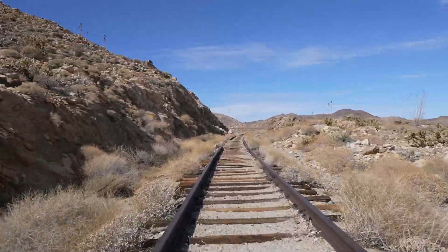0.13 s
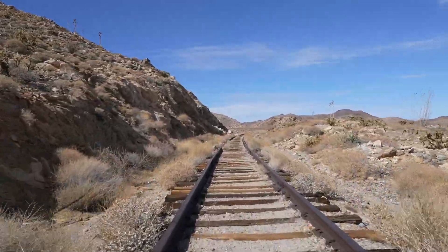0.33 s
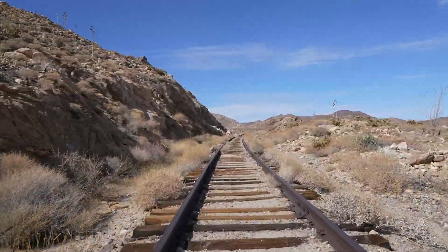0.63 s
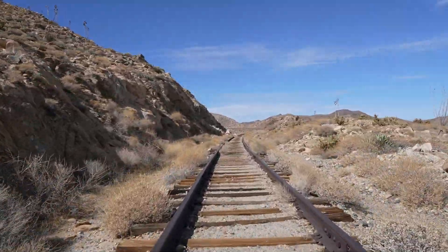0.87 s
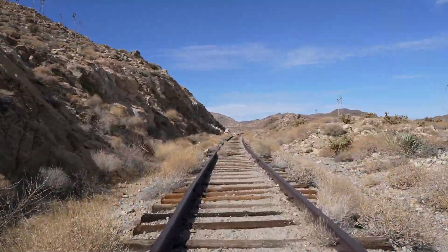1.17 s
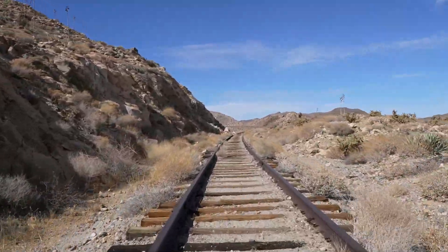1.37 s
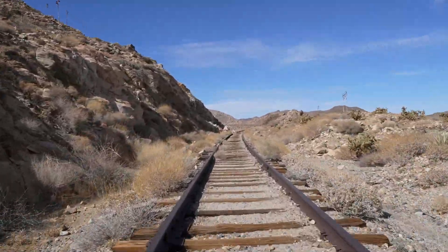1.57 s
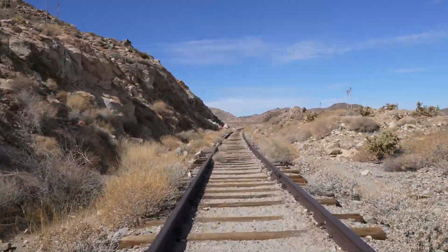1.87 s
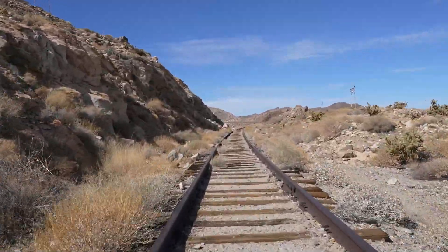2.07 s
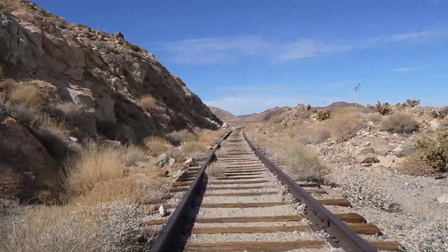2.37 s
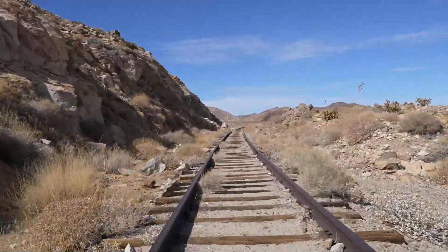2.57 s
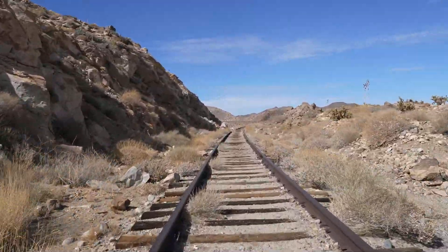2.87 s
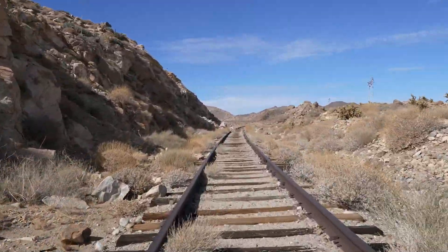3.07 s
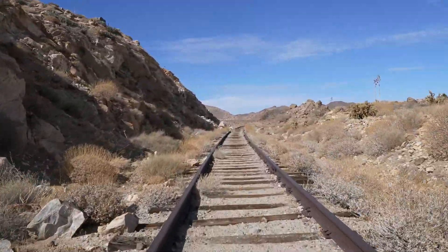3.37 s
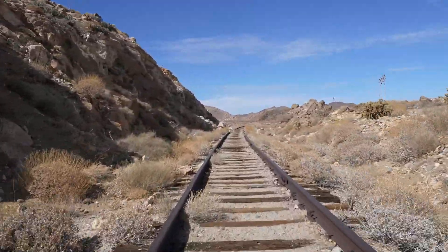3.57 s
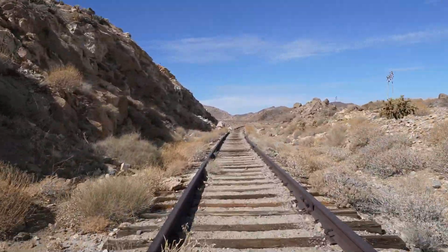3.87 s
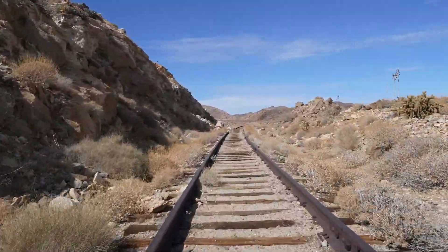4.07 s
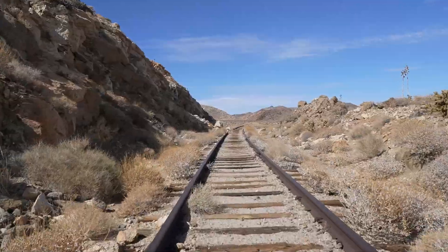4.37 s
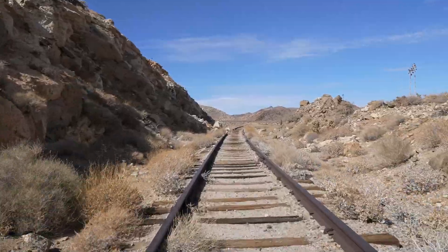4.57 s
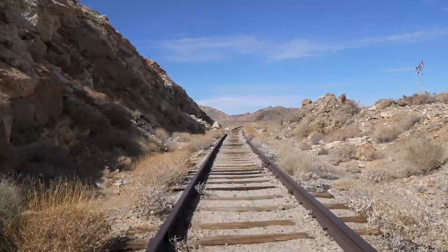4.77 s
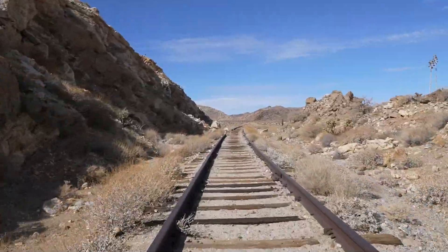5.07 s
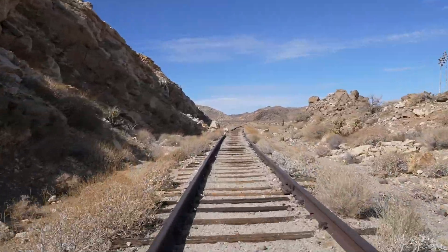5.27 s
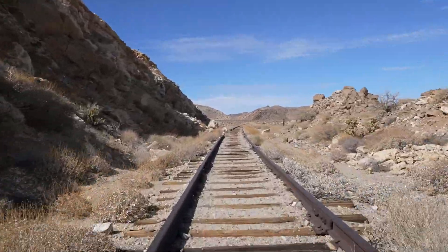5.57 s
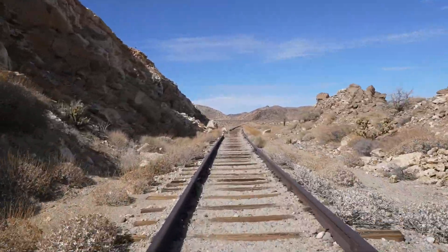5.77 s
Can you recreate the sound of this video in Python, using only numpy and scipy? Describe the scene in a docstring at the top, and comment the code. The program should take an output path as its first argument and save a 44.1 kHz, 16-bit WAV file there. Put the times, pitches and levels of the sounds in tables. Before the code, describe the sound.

A small motor cart rolls along railway tracks with a loud throbbing rumble, a puttering engine and scattered sharp clacks.

```python
"""A throbbing boom and a puttering engine: a small motor cart on old desert track, heard from on board.
Out-of-round wheels pump the deck and tap twice a turn; the one-cylinder engine puffs and rings its casing.
The boom lurches about once a turn, the frame rumbles, and rough spots jolt it with a crack, clack and thud.
Underneath, steel grinds on rusty rail, dry weeds swish along the underside and the air stream rumbles."""
import sys
import numpy as np
from scipy import signal
from scipy.fft import rfft, irfft
from scipy.io import wavfile
from scipy.ndimage import uniform_filter1d, minimum_filter1d

SR = 44100
rng = np.random.default_rng(int(sys.argv[2]) if len(sys.argv) > 2 else 0)


def bounce(signal):
    """Save signal as a 16-bit WAV file at the path given by the first command-line argument."""
    frames = np.transpose(np.atleast_2d(signal))
    limited = np.clip(frames, -1, 1)
    pcm = np.round(limited * 32767).astype(np.int16)
    wavfile.write(sys.argv[1], SR, pcm)


N = 260631
T = np.arange(N) / SR
FREQS = np.arange(N // 2 + 1) * SR / N

# the deck's boom along the ride: (time [s], level [dB], width as side minus mid [dB])
DECK_BOOM = [(0, -22, 9), (.45, -16, 25), (.6, -15, 8), (.82, -22, -1), (1.0, -29, 38), (1.2, -30, -5),
             (2.2, -22, 4), (2.68, -27, 10), (3.15, -20, -6), (3.9, -21.5, 19), (4.4, -19.5, 9),
             (4.7, -29, -3), (5.2, -18, 26), (5.65, -21, 4), (5.91, -20, 2)]
# lurches of the low boom, about one per wheel turn: (time [s], mid level [dB], side level [dB])
BOOM_LURCHES = [(0.07, -39, -12), (0.17, -29, -21), (0.25, -39, -17), (0.34, -33.0, -20), (0.54, -23, -26),
                (0.63, -26, -10.5), (0.73, -16.5, -22), (0.82, -14, -33), (0.97, -36, -12),
                (1.07, -23.5, -18), (1.15, -18, -33.0), (1.28, -23.5, -22), (1.37, -22, -19),
                (1.44, -15.5, -33.0), (1.52, -20, -31), (1.62, -17.5, -37), (1.72, -16.5, -34),
                (1.84, -25, -16), (1.93, -16.5, -33.0), (2.03, -23, -19), (2.12, -16, -34),
                (2.21, -12, -21), (2.31, -18, -33.0), (2.41, -16, -34), (2.46, -19, -22),
                (2.55, -28.5, -15.5), (2.83, -24, -35), (2.88, -22, -23.5), (2.97, -31, -15.0),
                (3.21, -24, -35), (3.3, -39, -20), (3.39, -16, -33.0), (3.501, -12, -33.0),
                (3.63, -28, -17), (3.719, -15, -29), (3.82, -23.5, -17), (3.95, -44, -17), (4.01, -21, -27),
                (4.09, -19, -28), (4.16, -33, -16), (4.24, -21, -16), (4.33, -18, -34), (4.52, -17.5, -17),
                (4.62, -16.5, -31.0), (4.71, -41, -15), (4.8, -13.5, -33.0), (4.98, -23, -33.0),
                (5.14, -24.5, -14), (5.27, -42, -6), (5.37, -25, -25), (5.43, -40, -14), (5.52, -43, -18),
                (5.61, -17.5, -14), (5.72, -23.5, -26)]
# moments when the wheels run light: (time [s], half length [s], level change [dB])
LIGHT_RUNNING = [(0.095, 0.027, -12.5), (0.47, 0.026, -7.5), (1.56, 0.016, -2.5), (2.237, 0.012, -19),
                 (2.5, 0.014, -3.5), (3.587, 0.02, 1), (4.37, .035, -3), (4.555, 0.019, -5),
                 (4.918, 0.015, -10), (5.08, 0.021, -5), (5.222, 0.036, -7), (5.291, 0.03, -12),
                 (5.414, .014, -5)]
# wheel speed: (time [s], turn rate [Hz])
TURN_RATE = [(0, 10.65), (2.8, 10.65), (3.4, 10.72), (4.9, 10.45), (5.9, 10.55)]
# engine speed: (time [s], firing rate [Hz])
FIRING_RATE = [(0.0, 27.65), (1.0, 28.09), (3.3, 28.05), (4.6, 27.48), (5.9, 27.67)]
# wheel hits on rough spots: (time [s], clack of loose parts [dB], crack of steel [dB], thud [dB],
# thud pitch [Hz], thud width as side minus mid [dB])
ROUGH_SPOTS = [(0.049, 0, 0, -22, 205, -5), (0.143, 0.5, 1.5, -14, 203, 21), (0.204, -10, -17, -19, 280, 0),
               (0.433, -5.5, -20, -17, 214, 11), (0.798, 2, 2.5, -17, 204, -2),
               (0.852, -5, -15, -27, 163, 3), (0.894, -10, -1.5, -18.5, 207, -14),
               (0.946, -5, -4, -27, 226, -4), (1.041, -15, -5.5, -16, 172, 6),
               (1.222, -8, -10, -22, 283, 2), (1.253, -2, -5, -22, 167, -1),
               (1.328, -15, -12, -17.5, 285.5, -2), (1.69, -1, -7, -24, 205, 10),
               (1.792, -12, -9, -17, 170, 24), (1.893, 0, -7, -18, 180, 10), (1.976, -6, -7, -13, 172, 18),
               (2.068, -18, -5, -15.5, 200, -4), (2.259, 2.5, -0.5, -16.5, 192, -2),
               (2.538, -7, -16, -17, 261, -4), (2.636, -6, -1.5, -18, 214, 5),
               (2.728, -3, -3, -12, 183, 14), (2.963, -9, -20, -16.5, 213, -6),
               (3.008, -3, -7, -23, 145, 0), (3.097, -9, -4, -20.5, 172, -1), (3.149, -5, -6, -29, 146, -2),
               (3.188, -13, -4, -17.5, 192, -6), (3.473, 5, 2.5, -14, 183, -10),
               (3.756, -0.5, -26, -21, 229, 15), (3.786, -1.5, -26, -34, 200, 8),
               (3.85, -6, -0.5, -18, 178, 12), (3.9, -10, -2, -16.5, 176, -8),
               (4.012, -14, -23, -21, 280, -2.5), (4.046, -14, -7, -23, 177, -4),
               (4.114, -1, -13, -24.5, 195, 2), (4.225, -2, -3, -27, 145, -1),
               (4.437, -1, -18, -25, 200, -2), (4.51, -6, -1, -20, 145, 1), (4.611, -16, -9, -21, 274, -10),
               (4.695, -5, -20, -18.5, 181, 19), (4.949, -3, -16, -15.5, 155, -6),
               (4.972, -13, -10, -19.5, 235, -5), (4.989, -6, 3.5, -20, 177, -10),
               (5.271, -1, -9, -29, 146, 6), (5.342, -6, -6, -19.5, 235, -8), (5.385, -3, -8, -23, 208, 4),
               (5.528, -10, -14, -25, 291, 2), (5.749, 0.5, 0, -21, 178, 3)]
# texture of the rail: (time [s], grind [dB], hiss [dB])
RAIL_SURFACE = [(0, -1.5, 2.5), (.5, -1, -1), (.8, -0.5, 1), (1.25, 0, 2), (2.2, -1, 0), (3.1, -1, 0.5),
                (4.35, -1, 1), (4.9, 0.5, 3.5), (5.91, 0.5, 4.5)]
# weeds brushing the cart: (time [s], half length [s], level [dB])
WEED_BRUSHES = [(0.734, 0.029, -10), (0.753, .007, -9), (.804, .005, -10), (1.907, 0.047, -13),
                (2.677, 0.2, -13.5), (3.497, 0.063, -13), (3.934, 0.027, -13), (5.74, 0.095, -13)]

# ringing modes: (frequency [Hz], bandwidth [Hz], level [dB per Hz])
CASING_MODES = [(593.5, 37, -61), (894, 47, -61.5), (1011.6, 39.5, -58.5), (1342, 146, -69.5),
                (1447, 60, -64.5), (1684, 21, -68.5), (2076, 160, -77), (2860, 110, -82.5)]  # engine casing
FRAME_MODES = [(126.5, 29.2, -44.5), (167.6, 46, -46.5), (221, 71, -49), (286.3, 53, -51.5),
               (352.4, 80, -58), (409.5, 86, -57)]  # frame and floor
WHEEL_MODES = [(937, 150, -67), (2970, 230, -66.5), (3950, 110, -85), (4690, 180, -75.5), (5420, 84, -73)]  # struck wheel

# noise colours: (frequency [Hz], level [dB per Hz])
EXHAUST_EQ = [(60, -71), (130, -55), (180, -49), (240, -49), (300, -51), (400, -63), (700, -78)]  # low, round puff
VALVE_EQ = [(500, -103), (1200, -71), (2500, -102), (3500, -89.5), (5000, -91.5), (8000, -100.5),
            (11000, -104)]  # thin tick
CLACK_EQ = [(300, -58), (600, -78), (1000, -62.5), (1400, -62), (2000, -72.5), (3000, -80.5), (5000, -91),
            (8000, -93), (15000, -108)]  # loose parts and wheel taps
CRACK_EQ = [(1600, -77), (2600, -72.5), (5000, -80), (8000, -85.5), (15000, -102)]  # bright bite of steel
GRIND_EQ = [(200, -100), (450, -65.5), (680, -63), (780, -65.5), (1000, -69.5), (1200, -75), (1700, -76),
            (2700, -79), (3400, -85), (5500, -89), (9000, -103)]  # midrange of the rolling treads
RUST_EQ = [(2000, -103), (4500, -92.5), (8000, -92.5), (10500, -97), (16000, -96.5)]  # fine, high hiss
WEED_EQ = [(2000, -93), (4000, -78), (8000, -79.5), (12000, -81), (16000, -80)]  # dry, airy swish
WIND_EQ = [(12, -47), (24, -47), (34, -50.5), (50, -47), (75, -42.5), (110, -46), (160, -56.5)]  # deep buffeting

# how much louder the left side is: (frequency [Hz], left minus right [dB])
LEFT_TILT = [(20, 0.5), (200, 0.5), (400, -0.5), (650, -3.5), (1000, 1), (1450, 0.5), (2100, 0.5),
             (3600, 3), (5000, 0.5), (7500, 2), (11000, 4.5), (20000, 1)]


def deck(half_turns, boom_db, width_db, boom_hz=100.15, swing_hz=2.8, wander_hz=6.16, width_drift_db=-8.5):
    """Wheel hop pumps the deck's drum mode twice a turn; its pitch rises under load; the boom lurches."""
    load = -np.cos(2 * np.pi * half_turns)
    hop_strength = uniform_filter1d(cycle_gains(half_turns, scatter_db=1.0), size=600)
    throb = undb(boom_db) * unit_rms((1 + 0.57 * load) * hop_strength)
    pitch_hz = boom_hz + swing_hz * load + wander_hz * wander(24.2)
    phase = 2 * np.pi * np.cumsum(pitch_hz) / SR
    spread = np.arctan(undb(width_db + width_drift_db * wander(2.9)))
    lurch_mid, lurch_side = lurches() * (1 + 0.5 * load)
    mid = np.hypot(throb * np.cos(spread), lurch_mid)
    side = np.hypot(throb * np.sin(spread), lurch_side)
    # the boom's left-right phase wanders at random, making it sound wide and shifting
    lead = np.arctan2(side, mid) * np.tanh(20 * wander(2.66))
    return np.hypot(mid, side) * np.sin(phase + np.array([lead, -lead]))


def lurches(half_s=0.034):
    """Mid and side envelopes of the low boom's lurches, about one per wheel turn."""
    return sum(undb([[mid_db], [side_db]]) * swell(s, half_s) for s, mid_db, side_db in BOOM_LURCHES)


def lulls():
    """A gain that ducks the rumble for a moment where the wheels run light."""
    return undb(sum(db * swell(s, half_s) for s, half_s, db in LIGHT_RUNNING))


def engine(firings, flare_db=1.63):
    """Each firing puffs the exhaust, ticks the valves and rattles the casing, whose modes flare singly."""
    rattle = 0.4 + 0.48 * blows(firings + 0.11, peak=0.23, scatter_db=1.6)
    casing = 0
    for mode in CASING_MODES:
        flare = undb(flare_db * wander(13))
        casing += flex(excite(rattle * flare, resonances([mode])))
    puffs = excite(blows(firings - .22, peak=0.2, scatter_db=1.7), colour(EXHAUST_EQ))
    ticks = excite(0.3 + .5 * blows(firings - .02, peak=0.38, scatter_db=3.0), colour(VALVE_EQ))
    return casing + puffs + ticks


def frame(shudder_db, swell_db=2.5):
    """Uneven rail shakes a rumble out of the frame; each mode swells and fades on its own."""
    rumble = 0
    for hz, bandwidth, db in FRAME_MODES:
        shaking = undb(shudder_db + db) * unit_rms(undb(swell_db * wander(8.9)))
        ring = excite(shaking, resonances([(hz, bandwidth, 0)]) ** 2)
        rumble += flex(ring, delay_s=.0008)
    return rumble


def shudder(rise_s=0.012, fall_s=0.024, rest_db=-0.9, jolt_db=-0.5, lurch_db=4, restless_db=1.0):
    """Frame shake in dB: it wanders, rises with each lurch, and builds as a wheel climbs a rough spot."""
    jolts = sum(undb(thud_db) * spike(s, rise_s, fall_s) for s, _, _, thud_db, _, _ in ROUGH_SPOTS)
    shake = 1 + undb(jolt_db) * jolts + undb(lurch_db) * np.hypot(*lurches())
    return rest_db + 20 * np.log10(shake) + restless_db * wander(15)


def knocks(clack_s=0.0052, scrape_db=-5.5, ring_db=6.5, grit_db=3.5, wander_hz=14.0):
    """A wheel hits a rough spot: steel cracks through grit, loose parts ring the casing, the frame thuds."""
    clack, crack, thuds = np.zeros(N), np.zeros(N), np.zeros((2, N))
    drift_cycles = wander_hz * np.cumsum(wander(39.5)) / SR
    for s, clack_db, crack_db, thud_db, thud_hz, width_db in ROUGH_SPOTS:
        age = np.maximum(T - s, 0)
        strike = pulse(age, clack_s) ** 2
        bite = spike(s + clack_s, rise_s=.003, fall_s=0.0078)
        flange_scrape = undb(scrape_db) * swell(s + clack_s, half_s=0.013)
        clack += undb(clack_db) * np.maximum(strike, flange_scrape)
        crack += undb(crack_db) * np.maximum(bite, flange_scrape)
        tail = slice(int(s * SR), int(s * SR) + SR // 4)
        thuds[:, tail] += undb(thud_db) * thud(age[tail], thud_hz, drift_cycles[tail], width_db)
    chatter = excite(clack, colour(CLACK_EQ))
    casing_ring = undb(ring_db) * excite(clack, resonances(CASING_MODES))
    crunch = crack * unit_rms(undb(grit_db * wander(900)))
    steel = excite(crunch, colour(CRACK_EQ))
    wheel_ring = flex(excite(crunch, resonances(WHEEL_MODES)))
    return chatter + casing_ring + steel + wheel_ring + thuds


def thud(age, hz, drift_cycles, width_db, overtone_hz=300.7, overtone_db=-12.5):
    """The jolted frame swings briefly in two bending modes; a phase lead on one side gives the width."""
    lead = np.arctan(undb(width_db)) * rng.choice([-1, 1]) * np.array([[1], [-1]])
    phase = 2 * np.pi * (hz * age + drift_cycles)
    overtone = undb(overtone_db) * np.sin(overtone_hz / hz * phase + lead)
    return pulse(age, peak_s=0.0093) * (np.sin(phase + lead) + overtone)


def rolling(half_turns, firings, grind_db, hiss_db, tap_db=-15.5):
    """Steel on rusty rail: the treads grind, hiss as the engine shakes them, and tap twice a turn."""
    grind = undb(grind_db + 0.3 * wander(21))
    treads = excite(grind * unit_rms(undb(2.1 * wander(43))), colour(GRIND_EQ))
    engine_shake_db = 1.15 * np.cos(2 * np.pi * (firings - .4))
    rust = excite(undb(hiss_db + engine_shake_db + 1.36 * wander(15)), colour(RUST_EQ))
    hops = blows(half_turns - .25, peak=0.26, scatter_db=2.5)
    taps = excite(undb(tap_db) * grind * hops, colour(CLACK_EQ))
    return treads + rust + taps


def weeds(crackle_db=2.4):
    """Dry stalks scrape past in short, crackly swishes."""
    touch = sum(undb(db) * swell(s, half_s) for s, half_s, db in WEED_BRUSHES)
    return excite(touch * undb(crackle_db * wander(900)), colour(WEED_EQ))


def wind(shudder_db, deck_width_db, gust_db=1.5, shake_share=0.17, width_share=0.34):
    """Air rumbles on the microphone, more as the frame shakes it, and widens and narrows with the boom."""
    gusts = unit_rms(undb(gust_db * wander(5.5) + shake_share * shudder_db))
    air = excite(gusts, colour(WIND_EQ))
    spread = np.arctan(undb(width_share * (deck_width_db - 7)))  # mid and side are even at 7 dB
    mid, side = np.cos(spread) * air[0], np.sin(spread) * air[1]
    return np.array([mid + side, mid - side])


def flex(pair, delay_s=.0004):
    """Flexing metal bends a ring's pitch up and down, by a small wandering delay."""
    bent_time = T + delay_s * wander(11.17)
    return np.array([np.interp(bent_time, T, channel) for channel in pair])


def excite(force, response):
    """Noise that follows a force, unrelated left and right, through a response given per Hz."""
    noise = force * rng.standard_normal((2, N))
    return irfft(rfft(noise) * response, N) * np.sqrt(SR / 2)


def resonances(modes):
    """Response of damped modes; neighbours swing in opposite senses."""
    response = 0
    for k, (hz, bandwidth, db) in enumerate(modes):
        damping = 1j * FREQS * bandwidth
        response += (-1) ** k * undb(db) * damping / (hz ** 2 - FREQS ** 2 + damping)
    return response


def colour(points):
    """EQ response through (frequency [Hz], level [dB]) points, falling 20 dB an octave past both ends."""
    hz, db = np.transpose(points)
    octave = np.log2(FREQS + 1)
    beyond = np.abs(octave - np.clip(octave, np.log2(hz[0]), np.log2(hz[-1])))
    return undb(np.interp(octave, np.log2(hz), db) - 20 * beyond)


def blows(cycles, peak, scatter_db):
    """One blow a cycle, each of its own strength, cresting near the share `peak` and dying by the next."""
    age = cycles % 1
    shape = age * np.exp(-age / peak) * (1 - age ** 6)
    return unit_rms(shape * cycle_gains(cycles, scatter_db))


def cycle_gains(cycles, scatter_db):
    """A random gain held for each cycle."""
    count = np.floor(cycles - np.floor(cycles[0])).astype(int)
    return undb(scatter_db * rng.standard_normal(1024)[count])


def pulse(age, peak_s):
    """A struck envelope: a quick climb to 1, then a longer tail."""
    return age / peak_s * np.exp(1 - age / peak_s)


def spike(s, rise_s, fall_s):
    """A pointed envelope: exponential rise to a moment, exponential fall after it."""
    return np.exp(-np.maximum((s - T) / rise_s, (T - s) / fall_s))


def swell(s, half_s):
    """A smooth rise and fall around a moment."""
    return np.exp(-((T - s) / half_s) ** 2)


def wander(rate_hz):
    """Smooth random modulation with a spread of 1."""
    drift = irfft(rfft(rng.standard_normal(N)) * np.exp(-(FREQS / rate_hz) ** 2), N)
    return drift / drift.std()


def curves(table):
    """One automation curve for each column after a table's time column."""
    times, *columns = np.transpose(table)
    return [np.interp(T, times, column) for column in columns]


def unit_rms(x):
    """Scale to an rms of 1."""
    return x / np.sqrt(np.mean(x ** 2))


def undb(db):
    """Decibels to gain."""
    return 10 ** (np.asarray(db) / 20)


def scene():
    """Mix the cart's layers, locked to two rhythms: the engine's firing and the turning wheels."""
    firings = np.cumsum(curves(FIRING_RATE)[0]) / SR
    half_turns = 2 * np.cumsum(curves(TURN_RATE)[0]) / SR + 0.22
    boom_db, width_db = curves(DECK_BOOM)
    grind_db, hiss_db = curves(RAIL_SURFACE)
    shudder_db = shudder()
    body = deck(half_turns, boom_db, width_db) + frame(shudder_db)
    rumble = lulls() * (body + wind(shudder_db, width_db))
    return rumble + engine(firings) + knocks() + rolling(half_turns, firings, grind_db, hiss_db) + weeds()


def record(dry):
    """Colour the two sides slightly apart, limit the heaviest bumps and cut the top steeply."""
    ceiling, top_hz = .55, 15800
    hz, left_db = np.transpose(LEFT_TILT)
    tilt_db = np.interp(np.log2(FREQS + 1), np.log2(hz), left_db) / 2
    tilted = irfft(rfft(dry) * undb([tilt_db, -tilt_db]), N)
    allowed_gain = ceiling / np.maximum(np.abs(tilted).max(axis=0), ceiling)
    limiter_gain = uniform_filter1d(minimum_filter1d(allowed_gain, size=600), size=600)
    high_cut = signal.ellip(12, .1, 90, top_hz, fs=SR, output="sos")
    return signal.sosfilt(high_cut, tilted * limiter_gain)


dry = scene()
out = record(dry)
bounce(out)
```